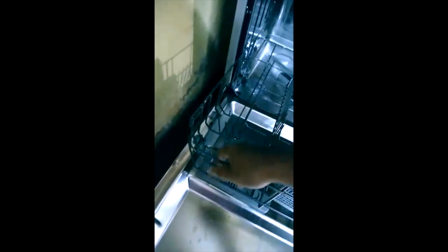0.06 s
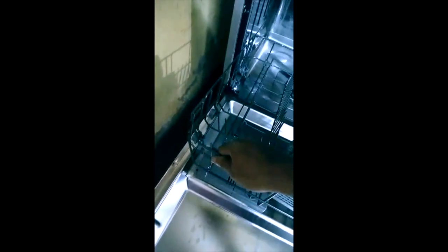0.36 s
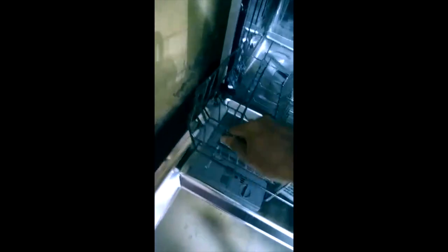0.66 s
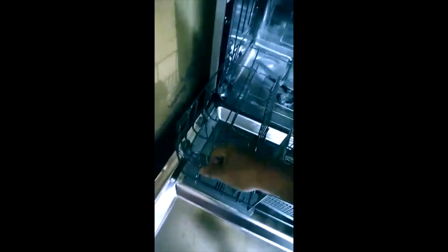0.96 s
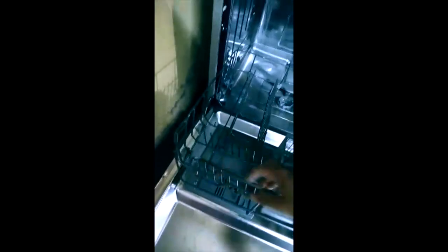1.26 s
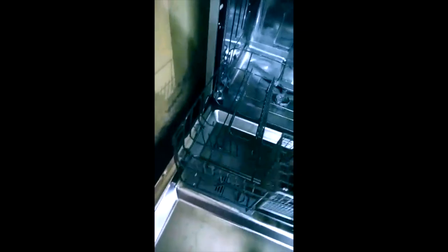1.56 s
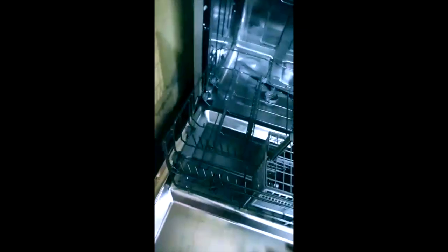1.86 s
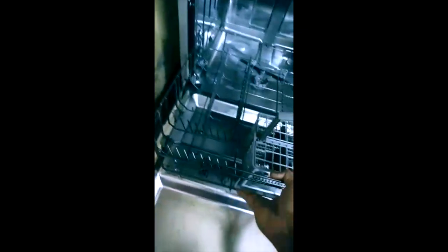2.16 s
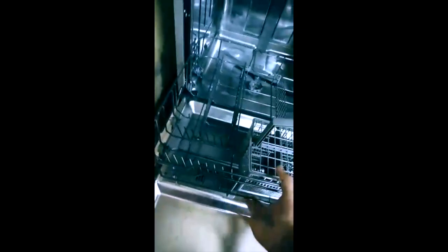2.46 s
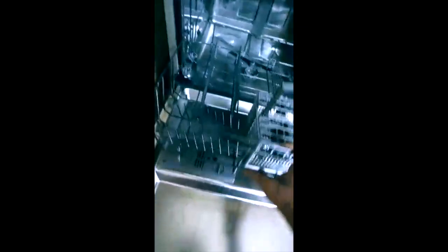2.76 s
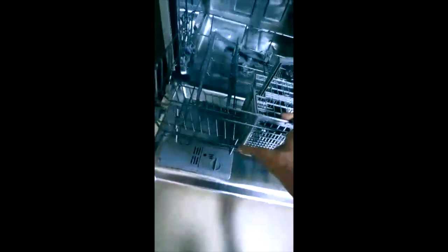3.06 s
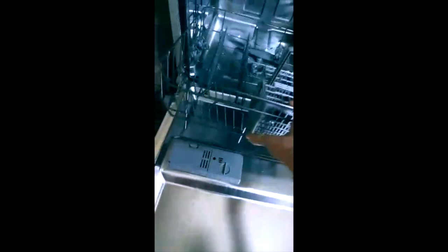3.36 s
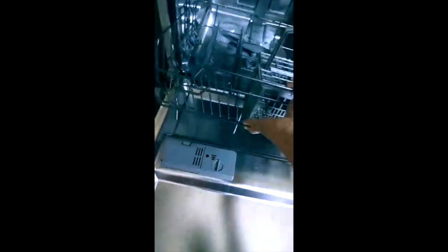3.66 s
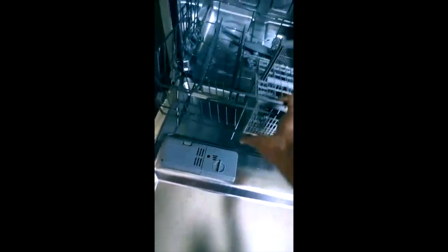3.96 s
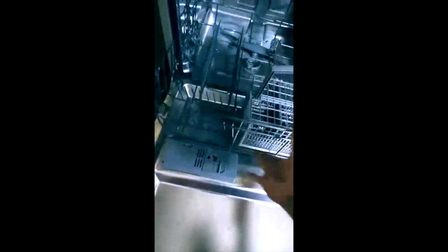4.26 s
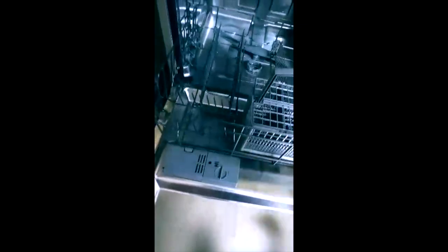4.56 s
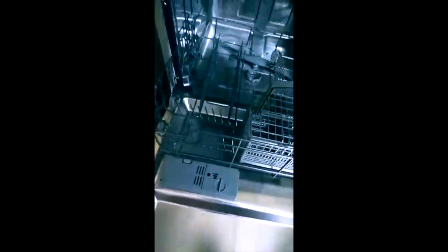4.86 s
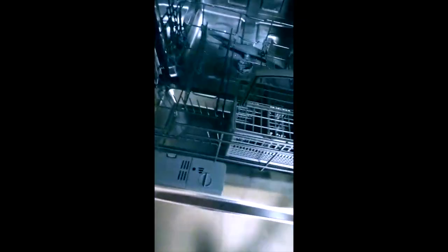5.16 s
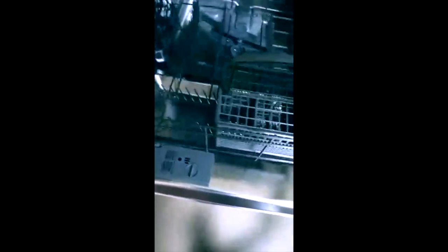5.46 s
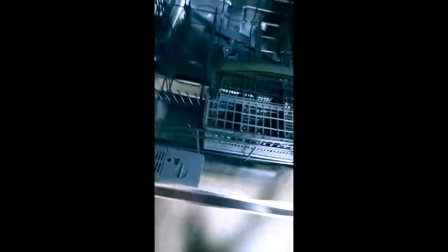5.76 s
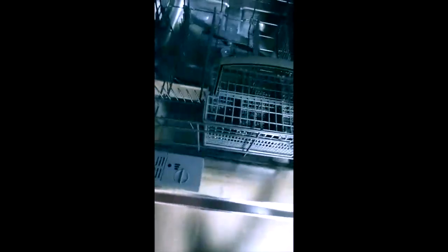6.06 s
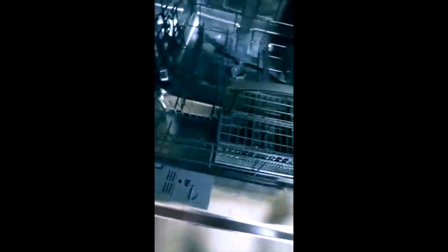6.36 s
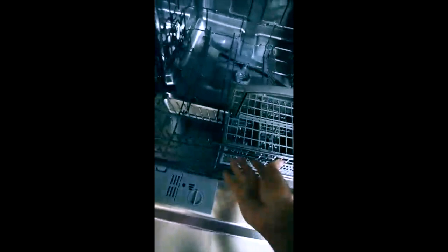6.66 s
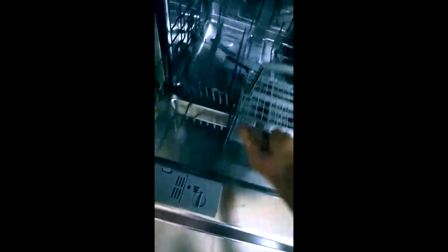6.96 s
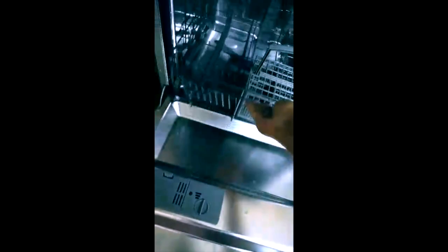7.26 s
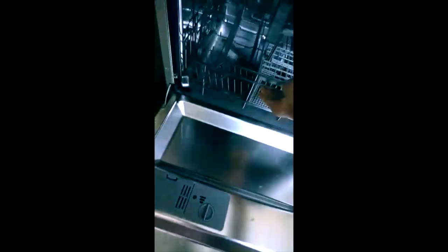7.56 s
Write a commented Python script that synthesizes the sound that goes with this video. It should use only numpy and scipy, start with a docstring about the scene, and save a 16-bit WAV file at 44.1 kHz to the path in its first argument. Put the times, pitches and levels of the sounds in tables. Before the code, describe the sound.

A wire dish rack is jostled onto its rails in a steel dishwasher, close to the microphone. Scattered knocks ring the wires and thump the hollow tub, with short rumbling slides and soft hisses between them. A loud burst of clatter comes past the middle, then the wheels roll in one swelling push and the rack bangs home. The hard kitchen echoes briefly, and a faint, shrill cricket pulses throughout.

```python
"""Dish rack shoved home

A wire rack is set onto its rails, rolled and shoved home in a steel dishwasher tub, close to a phone.
Each knock, jolt or bump is a cluster of contacts that rings the wires and thumps the tub; the wheels
rumble in short slides and one long push. A hard kitchen echoes it all; a cricket chirps beyond."""
import sys
import numpy as np
from scipy import signal
from scipy.fft import rfft, irfft, next_fast_len
from scipy.io import wavfile

SR = 44100
rng = np.random.default_rng(int(sys.argv[2]) if len(sys.argv) > 2 else 0)


def log_audio(samples):
    """Write samples as a 16-bit WAV file to the path given in sys.argv[1]."""
    # one column per channel
    frames = np.atleast_2d(samples).T
    # limit to full scale, then quantise
    limited = np.clip(frames, -1, 1)
    pcm = np.round(limited * 32767).astype(np.int16)
    wavfile.write(sys.argv[1], SR, pcm)


N = 340011
T = np.arange(N) / SR


# sharp hits (time [s], level [dB], weight [dB], hardness [dB], clang [Hz], rattle decay [s])
KNOCK_HITS = [(0.906, -18, -4, -6.5, 1420, 0.0052), (0.99, -28.5, 2, -3.5, 480, 0.0067),
              (1.316, -42, 4, -1.5, 620, 0.042), (1.4, -35, -5, -6.5, 650, 0.0051),
              (1.581, -29, 1, -19.5, 650, 0.01), (1.635, -28, -6, -13.5, 900, 0.0087),
              (1.668, -20.5, -4, -5, 1580, .013), (2.062, -26, -1, -7, 530, .004),
              (2.331, -26, -6.5, -5.5, 950, 0.0044), (2.695, -40.5, 1.5, 3, 1690, 0.011),
              (2.927, -36.5, -3.5, -3, 593, 0.042), (3.088, -32.5, -9, 0.5, 460, 0.077),
              (3.258, -32, -7, 4, 1190, 0.0024), (3.894, -31.5, 0, -8.5, 590, 0.029),
              (4.211, -15.5, -11.5, -9, 560, 0.018), (4.221, -19.5, -1.5, -5.5, 890, 0.01),
              (4.943, -42, 2.5, -11.5, 596, 0.015), (5.012, -51, -1, -2.5, 585, .015),
              (5.438, -10, -8, -1.5, 1580, 0.004), (5.494, -17.5, 1.5, -1.5, 483, 0.024),
              (5.556, -11, -4.5, -11.5, 1320, 0.011), (6.791, -31, -7, -9, 715, .015),
              (6.809, -23, -1.5, -8, 715, 0.0049), (7.103, -40.5, 3, -5.5, 750, 0.025),
              (7.283, -27.5, -4, -3.5, 755, 0.085), (7.447, -34, 2.5, 3.5, 1350, 0.013),
              (7.52, -19.5, 10, 9, 1560, 0.018), (7.539, -16, 3, -14, 494, 0.035),
              (7.633, -24.5, -6, 1, 920, .012)]

def knocks():
    """Wire strikes steel: an instant attack, then a rattle."""
    return sum(blow(s, register_levels(db, weight, hardness), *place(s), clang_hz,
                    build_s=.0001, rattle_s=rattle_s, crack_db=-5.5, rebound_db=-10)
               for s, db, weight, hardness, clang_hz, rattle_s in KNOCK_HITS)


# loose hits (time [s], level [dB], weight [dB], hardness [dB], clang [Hz])
JOLT_HITS = [(1.683, -15.5, -4, -5, 1590), (3.205, -33.5, -18, -5, 1230), (3.24, -34.5, 7.5, -3, 480),
             (4.272, -20, -4.5, -9.5, 830), (5.472, -22, 4.5, 4.5, 480), (5.571, -13.5, -9.5, -1.5, 840),
             (5.617, -28, 6, 7, 1520), (5.662, -20, 2.5, 1, 500), (5.815, -27, 1.5, -6, 697),
             (5.839, -21, -21, -1.5, 630), (5.854, -15.5, -4.5, -9.5, 715), (5.907, -27, -7, -0.5, 640),
             (6.01, -32.5, 2, -10, 675), (6.115, -28.5, -11, -5.5, 1610), (7.595, -17.5, -1, -7, 1750),
             (7.682, -24, -1, -15, 830)]

def jolts():
    """The wires start to chatter before the rack lands."""
    return sum(blow(s, register_levels(db, weight, hardness), *place(s), clang_hz,
                    build_s=0.017, rattle_s=0.0062, crack_db=-14, rebound_db=-12)
               for s, db, weight, hardness, clang_hz in JOLT_HITS)


# dull hits (time [s], level [dB], thump [Hz])
BUMP_HITS = [(0.077, -34, 170), (0.266, -44, 187), (0.773, -25.5, 246), (1.02, -30.5, 192),
             (2.122, -38, 275), (3.541, -41.5, 340), (3.799, -38.5, 390), (5.37, -27.5, 330),
             (5.414, -15.5, 370), (6.542, -43.5, 220), (6.914, -32.5, 325)]
# their dark balance (thump [dB], clang [dB], ring [dB], tick [dB])
BUMP_MIX = (3, -10.5, -17, -21)

def wheel_bumps():
    """A wheel bumps on sheet steel: mostly thump, little top."""
    return sum(blow(s, db + np.array(BUMP_MIX), thump_hz, *place(s)[1:], clang_hz=480,
                    build_s=.0003, rattle_s=0.014, crack_db=-7, rebound_db=-22)
               for s, db, thump_hz in BUMP_HITS)


def register_levels(db, weight, hardness, tick_db=-9):
    """Heavy contacts thump the tub; hard ones ring the wires and tick."""
    return db + np.array([weight, 0, hardness, tick_db + hardness])


# the rack's tone on the door, on the rails and against the back wall
# (start [s], tub thump [Hz], wire ring [Hz], ring boost [dB], tick trim [dB])
RACK_POSITIONS = [(0, 204, 2850, 1, -3), (5.3, 370, 1570, 5, 1), (7.5, 139, 3720, 2, 0)]

def place(s):
    """Where the rack stands at time s tunes the tub and wires."""
    return RACK_POSITIONS[sum(row[0] <= s for row in RACK_POSITIONS[1:])][1:]


# layers of a hit: thump, clang, ring, tick (low cut [Hz], high cut [Hz], trim [dB], room t60 [s])
HIT_REGISTERS = [(78, 427, 25.5, 0.66), (418, 1700, 25.5, 0.46), (1970, 4570, 27, 0.42),
                 (5150, 12200, 28.5, 0.45)]

def blow(s, levels_db, thump_hz, ring_hz, ring_db, tick_db, clang_hz,
         build_s, rattle_s, crack_db, rebound_db, rebound_s=0.044, size=24000, lead=2200):
    """A chatter of contacts builds, strikes and dies away, ringing rack and tub."""
    t = (np.arange(size) - lead) / SR
    landing = lambda u: np.exp(-np.abs(u) / np.where(u < 0, build_s, rattle_s))
    chatter = contacts(size, per_s=900, scatter_db=1.5)
    crack = undb(crack_db) * (t == 0)
    force = unit_energy(chatter * landing(t)) + crack
    rebound = undb(rebound_db) * unit_energy(chatter * landing(t - rebound_s))
    drives = force + rebound, force, force, force  # the springy rack lands again: thump only

    rack = rack_response()
    ring_t = np.arange(len(rack)) / SR
    thump = resonance(ring_t, thump_hz, width_hz=55, lift_db=7)
    clang = resonance(ring_t, clang_hz, width_hz=170, lift_db=6)
    wires = resonance(ring_t, ring_hz, width_hz=400, lift_db=ring_db) + nearby_wires(ring_t)
    response = convolve(rack, (ring_t == 0) + thump + clang + wires)[0]

    echoes, out = diffuse_noise(size), np.zeros((2, N + size))
    start = max(int(s * SR) - lead, 0)
    mix_db = levels_db + [0, 0, 0, tick_db]
    for drive, db, (low_hz, high_hz, trim_db, t60) in zip(drives, mix_db, HIT_REGISTERS):
        layer = band(convolve(kitchen(drive, echoes, t60), response), low_hz, high_hz)
        out[:, start:start + size] += undb(db + trim_db) * unit_energy(layer)
    return out[:, :N]


# resonant peaks of rack and tub (pitch [Hz], width [Hz], boost [dB])
RACK_MODES = [(117, 30, 7), (179.7, 18, 4.5), (240.7, 37, 7.5), (316, 8.2, 8.5), (381, 7.3, 7),
              (606, 55, 5), (681, 21, 5.5), (801, 54, 8.5), (886, 19, 6.5), (1177, 32, 6), (1284, 18, 5),
              (1439, 19, 6), (1556, 14, 1.5), (1638, 23, 3.5), (1880, 33, -0.5), (1850, 42, 2.5),
              (2300, 34, 4.5), (2315, 19, 2), (2520, 69, 3), (2775, 27, 5.5), (2970, 17, -0.5),
              (3720, 40, 4.5), (4090, 77, 7), (4486, 156, 8)]
# overall tone of the clatter: full lows and mids, a dip near 5 kHz, a bright top
# (frequency [Hz], gain [dB])
CLATTER_EQ = [(30, -38), (70, -3.5), (105, 0), (320, 2), (450, 2.5), (800, -4), (1020, -4), (1550, -4.5),
              (2500, -8.5), (3300, -12.5), (4650, -20.5), (5200, -23.5), (8800, -15), (11000, -27),
              (14400, -22.5)]

def rack_response(size=6000):
    """Rack and tub ring after one sharp contact; an EQ shapes the overall tone."""
    t = np.arange(size) / SR
    return colour((t == 0) + sum(resonance(t, *mode) for mode in RACK_MODES), CLATTER_EQ)


def nearby_wires(t, low_hz=600, high_hz=4000, mean_width_hz=40, lift_db=5, count=16):
    """The tines and cross-wires next to a contact ring at pitches of their own."""
    detune, damping = rng.random((2, count, 1))
    spread = (np.arange(count)[:, None] + detune) / count
    hz = low_hz * (high_hz / low_hz) ** spread
    return resonance(t, hz, mean_width_hz * (.5 + damping), lift_db).sum(axis=0)


# short slides (start [s], end [s], scrape level [dB], rumble over scrape [dB])
SHORT_SLIDES = [(0.04, 0.1, -53, 3.5), (0.553, 0.775, -59, -5), (1.322, 1.447, -45, 5),
                (2.224, 2.3, -47, 1.5), (2.388, 2.636, -58.5, 3), (2.73, 2.784, -52.5, 5),
                (3.003, 3.37, -50.5, 1), (5.317, 5.7, -40, -1), (5.924, 6.155, -45.5, 3)]
# swell of the long push home (time [s], scrape level [dB])
LONG_PUSH = [(6.199, -74), (6.549, -66.5), (6.72, -53), (7.0, -51.5), (7.2, -47), (7.34, -38.5),
             (7.48, -45), (7.71, -31)]

def rolling(idle_scrape_db=-67.5, idle_rumble_db=-61.5, catch_db=-6):
    """Tiny bumps under the wheels shake wires and tub; a faint tremble stays between moves."""
    push_s, push_db = np.transpose(LONG_PUSH)
    pushing, effort_db = T >= push_s[0], np.interp(T, push_s, push_db)
    push_rumble_db = -43.5 + 0.73 * (effort_db + 45)  # the low end swells less than the scrape
    scrape = np.hypot(undb(idle_scrape_db), pushing * undb(effort_db))
    rumble = np.hypot(undb(idle_rumble_db), pushing * undb(push_rumble_db))
    for start_s, end_s, db, rumble_db in SHORT_SLIDES:
        motion = undb(db) * swell(start_s, end_s, attack_s=0.034, t60=0.49)
        scrape = np.hypot(scrape, motion)
        rumble = np.hypot(rumble, motion * undb(rumble_db))
    grain = unit(contacts(N, per_s=300, scatter_db=5))
    catches = undb(catch_db) * unit(contacts(N, per_s=22, scatter_db=0))  # a wheel snags and ticks
    echoes = diffuse_noise(next_fast_len(N))[:, :N]
    ring = convolve(kitchen(grain + catches, echoes, t60=0.38), rack_response())
    return unit(band(ring, 520, 2800, order=2)) * scrape + unit(band(ring, 85, 392)) * rumble


def kitchen(force, echoes, t60, direct_db=-10, tub_db=-1.5, tub_t60=.08, room_db=-5, size=20000):
    """Contacts arrive directly, then linger as dense echoes, first in the tub, then in the room."""
    t = np.arange(size) / SR
    tub = undb(tub_db) * unit_energy(fade(t, tub_t60))
    room = undb(room_db) * unit_energy(fade(t, t60) * (1 - np.exp(-t / 0.0076)))
    tail = np.sqrt(np.abs(convolve(force ** 2, tub ** 2 + room ** 2)))
    direct = np.array([np.roll(force, 8), force])  # reaches the left side 8 samples late
    return undb(direct_db) * direct + tail * echoes


# hiss cues (start [s], end [s], level [dB])
HISS_SWELLS = [(1.38, 1.78, -53.5), (1.97, 2.28, -56), (3.544, 3.886, -48), (5.327, 5.42, -46.5)]
# their airy tone (frequency [Hz], gain [dB])
HISS_EQ = [(1000, -36), (2500, -7), (4500, -7.5), (6200, -7.5), (8500, 7), (11000, -5.5), (14000, -10)]

def hiss():
    """A soft, wide hiss swells and fades as the rack is shifted."""
    level = sum(undb(db) * swell(start_s, end_s, attack_s=0.061, t60=0.58)
                for start_s, end_s, db in HISS_SWELLS)
    return level * unit(colour(rng.standard_normal((2, N)), HISS_EQ))


# the cricket's pace (time [s], chirps so far [count])
CRICKET_PACE = [(0, -.15), (1.265, 13), (2.06, 21), (3.415, 35), (4.555, 47), (5.22, 54), (6.2, 64),
                (7.76, 80)]
# its narrow, shrill tone (frequency [Hz], gain [dB])
CRICKET_EQ = [(5500, -77), (6700, -33), (7050, -16), (7350, -5), (7650, -5), (7950, -13), (8500, -19.5),
              (9400, -25.5), (10500, -52), (13000, -64)]

def cricket(level_db=-53, throb_db=4, waver_db=0.1, pan_db=-1.8, stroke_db=-11):
    """Wing strokes about ten times a second, smeared by the walls into a throbbing band."""
    phase = 2 * np.pi * np.interp(T, *np.transpose(CRICKET_PACE))
    waver = np.interp(T, np.linspace(0, T[-1], num=30), rng.standard_normal(30))
    song = colour(rng.standard_normal((2, N)), CRICKET_EQ)
    echo = unit(song * undb(throb_db * np.cos(phase) + waver_db * waver))
    pulse = ((1 + np.cos(phase)) / 2) ** 2
    stroke = unit(band(song, 7600, 7800, order=2) * pulse)  # each stroke peaks a little brighter
    return (echo + undb(stroke_db) * stroke) * undb(level_db + np.array([[pan_db], [-pan_db]]))


# room tone (frequency [Hz], gain [dB])
ROOM_EQ = [(25, -10.5), (100, 5), (280, -13.5), (420, -15.5), (600, -1), (1000, -29.5), (2500, -12),
           (4600, -15), (5500, -21), (14000, -23.5)]

def room_tone(level_db=-63):
    """A faint, steady bed of kitchen air."""
    return undb(level_db) * unit(colour(diffuse_noise(next_fast_len(N))[:, :N], ROOM_EQ))


# stereo tilt (frequency [Hz], left over right [dB])
STEREO_LEAN = [(60, 3), (140, 17.5), (280, 12.5), (550, 0), (1300, 3), (2600, 6), (4500, -2), (8000, 1),
               (13000, 2.5)]

def microphones(x):
    """The phone's two ports hear the machine with different colour."""
    hz, lean_db = np.transpose(STEREO_LEAN)
    right_db = 10 * np.log10(2 / (1 + undb(lean_db) ** 2))
    return np.array([colour(x[0], np.c_[hz, right_db + lean_db]), colour(x[1], np.c_[hz, right_db])])


def diffuse_noise(size, shared_hz=430):
    """Diffuse sound at two microphones: alike in the bass, unrelated in the treble."""
    hz = np.fft.rfftfreq(size, 1 / SR)
    width = np.pi / 4 * hz ** 2 / (hz ** 2 + shared_hz ** 2)
    mid, side = rfft(rng.standard_normal((2, size)))
    return irfft(np.cos(width) * mid + np.sin(width) * side * np.array([[1], [-1]]), size)


def contacts(size, per_s, scatter_db):
    """Irregular touches of unequal strength."""
    strength = rng.choice([-1, 1], size) * undb(scatter_db * np.clip(rng.standard_normal(size), -2, 2))
    return (rng.random(size) < per_s / SR) * strength


def resonance(t, hz, width_hz, lift_db):
    """Ringing that, added to an impulse, lifts the band around hz."""
    damping = np.pi * width_hz
    return (undb(lift_db) - 1) * 2 * damping / SR * np.exp(-damping * t) * np.cos(2 * np.pi * hz * t)


def swell(start_s, end_s, attack_s, t60):
    """Rise, hold until end_s, die away."""
    return np.clip((T - start_s) / attack_s, 0, 1) * fade(np.maximum(T - end_s, 0), t60)


def fade(t, t60):
    """Decay by 60 dB in t60 seconds."""
    return np.exp(-np.log(1000) * t / t60)


def colour(x, curve, size=4096):
    """Minimum-phase EQ through (frequency [Hz], gain [dB]) points."""
    hz, db = np.transpose(curve)
    bins_hz = np.maximum(np.fft.rfftfreq(size, 1 / SR), 1)
    gain_db = np.interp(np.log(bins_hz), np.log(hz), db)
    cepstrum = irfft(gain_db * np.log(10) / 20)
    cepstrum[1:size // 2] *= 2
    cepstrum[size // 2 + 1:] = 0
    response = irfft(np.exp(rfft(cepstrum)))
    return convolve(x, response).reshape(x.shape)


def band(x, low_hz, high_hz, order=3):
    """Band-pass."""
    return signal.sosfilt(signal.butter(order, [low_hz, high_hz], "band", fs=SR, output="sos"), x)


def convolve(x, response):
    """Pass each channel through a response, keeping its length."""
    return signal.fftconvolve(np.atleast_2d(x), response[None], axes=1)[:, :x.shape[-1]]


def undb(db):
    """Decibels to gain."""
    return 10 ** (np.asarray(db) / 20)


def unit(x):
    """Scale to rms 1."""
    return x / np.sqrt(np.mean(x ** 2))


def unit_energy(x):
    """Scale to energy 1 along time."""
    return x / np.sqrt(np.sum(x ** 2, axis=-1, keepdims=True))


def scene():
    """The rack up front; room tone, soft hiss and the cricket behind."""
    rack = knocks() + jolts() + wheel_bumps() + rolling()
    return microphones(rack + room_tone()) + hiss() + cricket()


def record(dry):
    """The phone rounds the loudest peaks and cuts the top."""
    high_cut = signal.ellip(10, .2, 80, 14550, fs=SR, output="sos")
    return signal.sosfilt(high_cut, np.tanh(dry))


dry = scene()
out = record(dry)
log_audio(out)
```